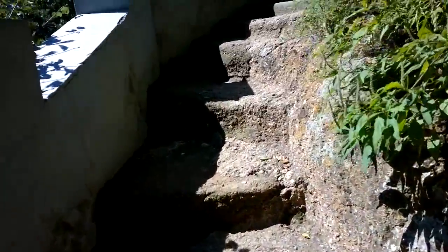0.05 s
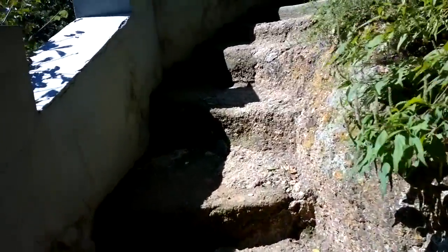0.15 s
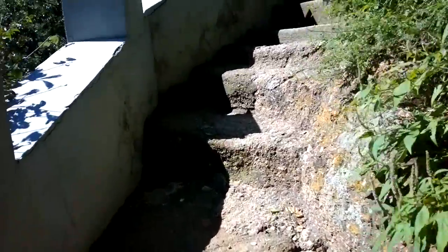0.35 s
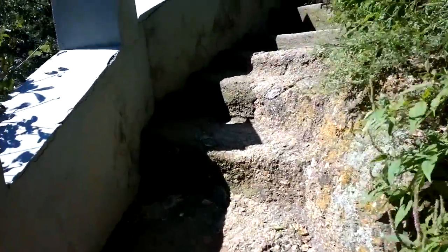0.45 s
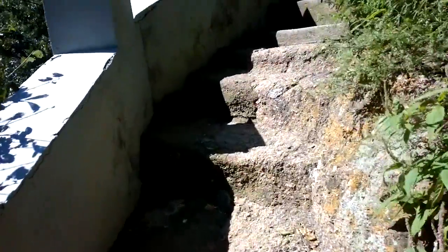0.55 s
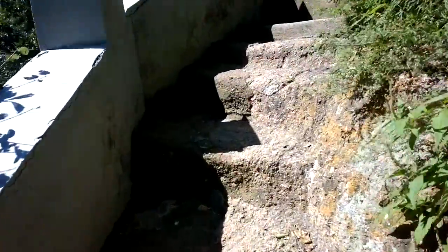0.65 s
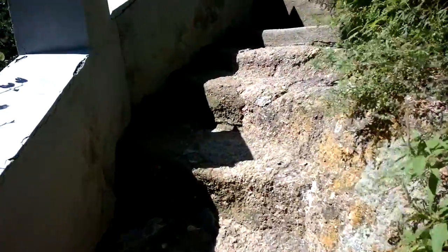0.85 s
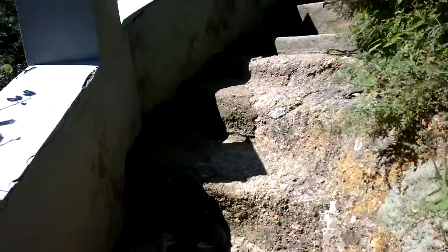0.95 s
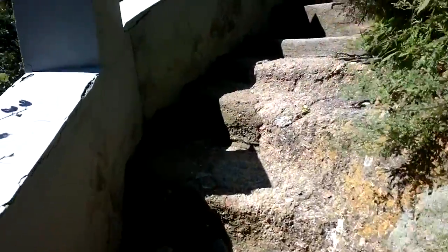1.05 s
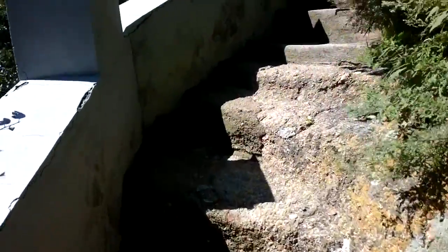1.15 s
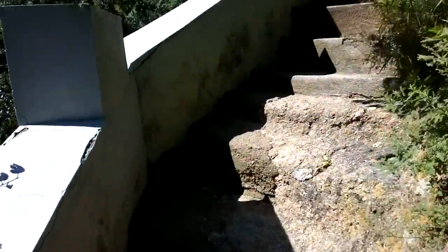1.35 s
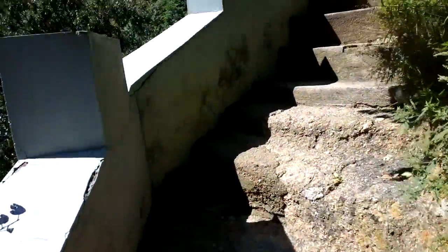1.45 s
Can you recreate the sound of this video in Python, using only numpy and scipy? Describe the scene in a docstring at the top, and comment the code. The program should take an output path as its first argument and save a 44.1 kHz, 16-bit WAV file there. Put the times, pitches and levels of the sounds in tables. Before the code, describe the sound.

Footsteps on stone stairs outdoors, close to the microphone: one thud, then another, then a shoe scraping over sand with tiny snaps. Behind them are faint, quick cricket chirps, a distant insect chorus and a steady low rumble.

```python
"""Footfalls on stone steps

Two close footfalls and a scuff on rough outdoor stone. Each contact thuds, rings the sole
and slaps the step; the slipping sole rubs, rasps and crunches sand. Grains and twigs snap,
and a low wall answers briefly. On the left a bush cricket chirps in quick wing strokes and a
lower one replies, over an insect chorus and a soft outdoor rumble."""
import sys
import numpy as np
from scipy import signal
from scipy.fft import rfft, irfft, next_fast_len
from scipy.io import wavfile
from scipy.ndimage import map_coordinates

SR = 44100
rng = np.random.default_rng(int(sys.argv[2]) if len(sys.argv) > 2 else 0)


def bounce(signal):
    """Save signal as a 16-bit WAV file at the path given by the first command-line argument."""
    frames = np.transpose(np.atleast_2d(signal))
    limited = np.clip(frames, -1, 1)
    pcm = np.round(limited * 32767).astype(np.int16)
    wavfile.write(sys.argv[1], SR, pcm)


N = 66150

# outdoor air, far insect bands: f/Hz, level/dB
AIR_SPECTRUM = [(20, -11), (48, 3), (110, -6.5), (190, -3), (320, -10), (450, -13), (700, -14.5),
                (1200, -20), (2500, -25), (6000, -27.5), (10000, -36), (15500, -40)]
LOW_CHORUS_SPECTRUM = [(2900, -52), (3500, -5.5), (3900, -0.5), (4300, 2.5), (4800, -4), (5500, -13),
                       (7000, -43.5)]
HIGH_CHORUS_SPECTRUM = [(6700, -47), (7100, -8.5), (7450, -3), (8400, -1.5), (9000, -4), (9800, -15),
                        (11500, -27.5)]
# stereo width: f/Hz, left-right correlation
AIR_COHERENCE = [(30, 0.43), (150, 0.93), (500, 0.74), (1200, 0.38), (3000, 0), (10000, 0)]
FOOT_COHERENCE = [(100, 1), (400, 0.86), (700, 0.98), (1300, 0.4), (2500, 0), (8000, 0)]
# stereo balance: f/Hz, left-right/dB
AIR_BALANCE = [(50, -3.5), (400, -0.5), (1200, -1.5), (2500, -5.5), (6000, 0.5), (14000, -2.5)]
FOOT_BALANCE = [(100, -2), (380, -1.5), (800, 0.5), (1500, -5), (2500, -6), (5000, -1.5), (14000, -2.5)]
# chirps of the near and the replying cricket: centre t/s, level/dB
NEAR_CHIRPS = [(.075, -62), (.18, -65.5), (0.278, -60), (.383, -57), (0.489, -57.5), (0.586, -56.5),
               (0.688, -57), (0.791, -55), (.895, -61.5), (0.995, -58.5), (1.093, -55.5), (1.199, -58),
               (1.302, -62.5), (1.41, -63), (1.49, -62.5)]
REPLY_CHIRPS = [(.1, -81), (.53, -67), (.645, -62), (.955, -67), (1.345, -69)]
# their wing resonances: f/Hz, level/dB
NEAR_WING_SPECTRUM = [(6800, -33), (7600, -20), (8100, -8.5), (8350, -3), (8700, -9.5), (9300, -18),
                      (10500, -41)]
REPLY_WING_SPECTRUM = [(6700, -41), (7150, -15), (7450, 5), (7800, -17), (8600, -30)]
# grains and twigs snapping: t/s, level/dB, f/Hz, left-right/dB
SNAPS = [(0.1832, -44, 2470, -11), (0.2312, -55.5, 2780, -26), (0.314, -52, 4700, -12),
         (0.361, -54, 1760, -5), (0.9019, -44, 4900, -1), (1.008, -43.5, 6150, 6), (1.39, -51.5, 6250, 10)]
# sole rolling or dragging: t/s, hold/s, rub/dB, rub f/Hz, rasp/dB, sand/dB
SOLE_SLIPS = [(0.221, 0.006, -58, 605, -77, -76), (0.268, 0.041, -52.5, 370, -69, -76),
              (0.44, 0.0067, -65, 890, -68, -63), (0.554, 0.0033, -62.5, 464, -88, -78),
              (0.611, 0.022, -59.5, 576, -84, -86), (0.8964, 0.0031, -65, 536, -56, -55),
              (0.904, 0.0089, -45, 790, -75, -66), (.922, 0.027, -57, 520, -69, -71),
              (1.036, .006, -65, 490, -57, -59), (1.052, 0.0042, -41.5, 580, -43, -62),
              (1.0601, 0.0023, -41.5, 584, -38.5, -57), (1.069, 0.01, -42, 592, -51, -58),
              (1.086, 0.023, -56, 603, -66.5, -63), (1.298, 0.038, -59.5, 153, -70.5, -89),
              (1.442, 0.0051, -57, 586, -88, -65.5), (1.474, 0.0078, -56.5, 800, -66, -71)]
# hollow rub: multiple of rub f, level/dB
RUB_SHAPE = [(.08, -16), (.35, -6.5), (.6, -7), (.9, 3), (1.15, 0.5), (1.5, -11), (2.2, -18), (4, -23),
             (10, -48)]
# stone rasp, fine sand, sole slap: f/Hz, level/dB
RASP_SPECTRUM = [(300, -9.5), (950, -16), (1250, -2.5), (1600, 3), (2000, -16.5), (2800, -13), (4000, -18),
                 (7000, -43)]
SAND_SPECTRUM = [(800, -8), (2500, 3), (4800, 3), (7000, -1.5), (10000, 1.5), (15500, -13)]
SLAP_SPECTRUM = [(60, -0.5), (300, 0.5), (900, -5), (1600, -13), (2600, -15), (3600, -29), (6000, -30),
                 (15000, -60)]
# sole landing: t/s, thud/dB, thud f/Hz, knock/dB, knock pitch ratio, slap/dB
SOLE_CONTACTS = [(.2462, -29, 118.5, -28, 1.032, -28.5), (0.256, -59, 58.4, -46.5, 0.98, -40),
                 (0.2629, -60, 149, -42.5, 1.11, -39.5), (0.8665, -35, 93, -76, 0.95, -43),
                 (0.8777, -35, 113, -38.5, 1.2, -32.5), (.9065, -53, 109, -53, 2.33, -66),
                 (.937, -60, 110, -53.5, 1.2, -45), (1.0553, -46, 190, -59, 1.48, -66),
                 (1.124, -60, 110, -55, 1.4, -64), (1.443, -74, 154, -59, 1.45, -54.5)]
# shoe on stone: f/Hz at pitch ratio 1, level/dB, T60/s
SOLE_MODES = [(250, 0, .075), (345, -2, .06), (420, -7, .055), (600, -13, .05), (820, -9, .05),
              (1030, -13, .04), (1280, -17, .022), (1980, -17, .02), (2560, -15, .035)]

AIR_DB = -58
CHIRP_SIGMA_S, STROKE_HZ, STROKE_DEPTH, STROKE_JITTER = 0.017, 120, 0.44, 0.109
SNAP_RISE_CYCLES, SCATTER_DB, SCATTER_T60_S = 1.2, -11, 0.022
SCUFF_RISE_S, SCUFF_T60_S, GRAINS_PER_S, GRAIN_SPREAD_DB = 0.0016, 0.041, 5000, 3.5
THUD_RISE_S, THUD_T60_S, THUD_CYCLES = 0.006, 0.09, 3.2
KNOCK_RISE_S, SLAP_T60_S = 0.0004, 0.026
WALL_DB, WALL_T60_S = -12, 0.11
TOP_HZ = 15720


def amp(db):
    """Decibels to gain."""
    return 10 ** (np.asarray(db) / 20)


def unit_rms(x):
    """Scale to rms 1."""
    return x / np.sqrt(np.mean(x ** 2) + 1e-20)


def log_interp(points, hz):
    """Interpolate (f/Hz, value) points on a log axis."""
    knots_hz, values = np.transpose(points)
    return np.interp(np.log(hz + 1), np.log(knots_hz + 1), values)


def since(start_s):
    """Seconds after start_s, zero before."""
    return np.maximum(np.arange(N) / SR - start_s, 0)


def decay(t, t60_s):
    """Exponential fall, 60 dB in t60_s."""
    return amp(-60 * t / t60_s)


def wobble(knots_per_s):
    """Smooth random curve."""
    return map_coordinates(rng.standard_normal(256), [np.arange(N) * knots_per_s / SR], mode="wrap")


def filtered(x, response):
    """Zero-phase filter of gain response(hz)."""
    size = next_fast_len(N + SR // 2)
    return irfft(rfft(x, size) * response(np.fft.rfftfreq(size, 1 / SR)), size)[..., :N]


def pan(db):
    """Stereo gains; positive is left."""
    return amp(np.array([[0.5], [-0.5]]) * db)


def noise():
    """Two independent white noises."""
    return rng.standard_normal((2, N))


def coloured(pair, spectrum, coherence=None):
    """Two independent signals to stereo of rms 1 with this spectrum and coherence."""
    def mid_side_gains(hz):
        correlation = log_interp(coherence, hz) if coherence else np.zeros_like(hz)
        angle = np.arccos(np.clip(correlation, -1, 1)) / 2
        return amp(log_interp(spectrum, hz)) * [np.cos(angle), np.sin(angle)]

    mid, side = filtered(pair, mid_side_gains)
    return unit_rms(np.array([mid + side, mid - side]))


def air(waver_db):
    """Outdoor rumble and faint hiss, wavering in level."""
    bed = amp(AIR_DB + waver_db * wobble(12.57)) * coloured(noise(), AIR_SPECTRUM, AIR_COHERENCE)
    return filtered(bed, lambda hz: pan(log_interp(AIR_BALANCE, hz)))


def chorus(spectrum, db, pan_db, pulse_db, waver_db, lead_s):
    """Far insects pulse loosely in step with the near cricket."""
    centres_s = [centre_s for centre_s, _ in NEAR_CHIRPS]
    beat = np.interp(since(0) + lead_s, centres_s, np.arange(len(centres_s)))
    level_db = db + pulse_db * np.cos(2 * np.pi * beat) + waver_db * (wobble(22.44) + wobble(200))
    return amp(level_db) * pan(pan_db) * coloured(noise(), spectrum)


def cricket(chirps, wing_spectrum, right_db):
    """Each chirp is a swell of quick wing strokes."""
    t = since(0)
    swell = sum(amp(db) * np.exp(-0.5 * ((t - centre_s) / CHIRP_SIGMA_S) ** 2) for centre_s, db in chirps)
    rate_hz = STROKE_HZ * (1 + STROKE_JITTER * wobble(39.9))
    strokes = 1 + STROKE_DEPTH * np.sin(2 * np.pi * np.cumsum(rate_hz) / SR)
    song = unit_rms(strokes * coloured(noise(), wing_spectrum))
    return swell * song * amp([[0], [right_db]])


def snaps():
    """Grains and twigs snap for a few cycles; the steps scatter each briefly."""
    out = np.zeros((2, N))
    for start_s, db, hz, pan_db in SNAPS:
        t = since(start_s)
        age = t * hz / SNAP_RISE_CYCLES
        snap = age * np.exp(1 - age) * np.sin(2 * np.pi * hz * t)
        band = coloured(noise(), [(hz / 2, -16), (hz, 0), (hz * 2, -24)])
        scatter = band * (t > 0) * decay(t, SCATTER_T60_S)
        out += amp(db) * pan(pan_db) * (snap + amp(SCATTER_DB) * scatter)
    return out


def grains():
    """Two dense trains of tiny slips of random size."""
    slips = rng.random((2, N)) < GRAINS_PER_S / SR
    return slips * np.sign(noise()) * amp(GRAIN_SPREAD_DB * noise())


def scuffs():
    """The sole slips over rough stone: hollow rub, rasp, fine sand."""
    rasp = coloured(grains(), RASP_SPECTRUM, FOOT_COHERENCE)
    sand = coloured(grains(), SAND_SPECTRUM, FOOT_COHERENCE)
    out = np.zeros((2, N))
    for start_s, hold_s, rub_db, rub_hz, rasp_db, sand_db in SOLE_SLIPS:
        rub = coloured(grains(), [(ratio * rub_hz, db) for ratio, db in RUB_SHAPE], FOOT_COHERENCE)
        attack = 1 - np.exp(-since(start_s) / SCUFF_RISE_S)
        pressure = attack * decay(since(start_s + hold_s), SCUFF_T60_S)
        out += pressure * (amp(rub_db) * rub + amp(rasp_db) * rasp + amp(sand_db) * sand)
    return out


def footfalls():
    """The weight lands with a thud and settles; the sole rings and slaps the stone."""
    slap_noise = coloured(noise(), SLAP_SPECTRUM, FOOT_COHERENCE)
    out = np.zeros((2, N))
    for start_s, thud_db, thud_hz, knock_db, pitch_ratio, slap_db in SOLE_CONTACTS:
        t = since(start_s)
        settle = np.clip(THUD_CYCLES - thud_hz * t, 0, 1)
        load = np.minimum(t / THUD_RISE_S, 1) * decay(since(start_s + THUD_RISE_S), THUD_T60_S) * settle
        out += amp(thud_db) * load * np.sin(2 * np.pi * thud_hz * t)
        knock = np.zeros(N)
        for k, (hz, db, t60_s) in enumerate(SOLE_MODES):
            gain = (-1) ** k * amp(db + rng.normal(0, 1))
            knock += gain * np.sin(2 * np.pi * pitch_ratio * hz * t) * decay(t, t60_s)
        slap = slap_noise * decay(t, SLAP_T60_S)
        attack = 1 - np.exp(-t / KNOCK_RISE_S)
        out += attack * (amp(knock_db) * knock + amp(slap_db) * slap)
    return out


def wall(x):
    """Short diffuse reflection off the wall and steps."""
    tail = coloured(noise(), [(100, -10.5), (10000, -15.5)], FOOT_COHERENCE) * decay(since(0), WALL_T60_S)
    return signal.fftconvolve(x, tail / np.linalg.norm(tail[0]), axes=1)[:, :N]


def scene():
    """Feet slightly right, crickets left, chorus and air all around."""
    feet = filtered(footfalls() + scuffs(), lambda hz: pan(log_interp(FOOT_BALANCE, hz))) + snaps()
    insects = (
        cricket(NEAR_CHIRPS, NEAR_WING_SPECTRUM, right_db=-13)
        + cricket(REPLY_CHIRPS, REPLY_WING_SPECTRUM, right_db=-8)
        + chorus(LOW_CHORUS_SPECTRUM, db=-66, pan_db=-3.5, pulse_db=1.5, waver_db=0.73, lead_s=0.002)
        + chorus(HIGH_CHORUS_SPECTRUM, db=-67.5, pan_db=4.5, pulse_db=0.5, waver_db=0.6, lead_s=0.0027))
    return feet + amp(WALL_DB) * wall(feet) + insects + air(waver_db=2.5)


def record(dry):
    """Brick-wall low-pass."""
    return filtered(dry, lambda hz: hz < TOP_HZ)


dry = scene()
out = record(dry)
bounce(out)
```